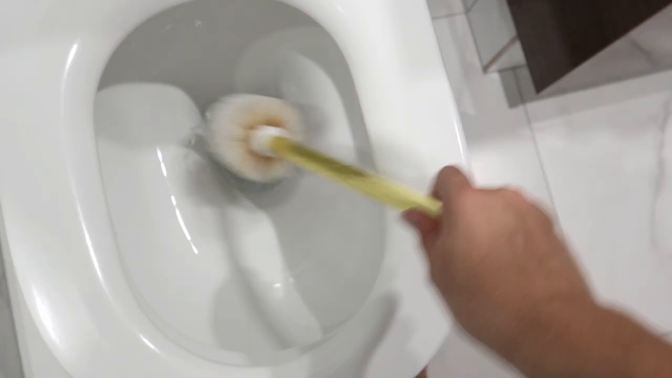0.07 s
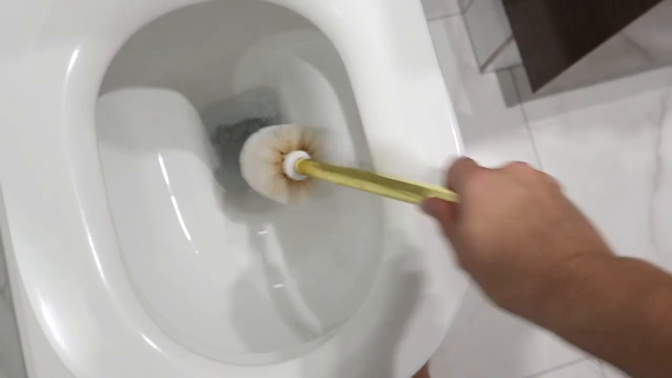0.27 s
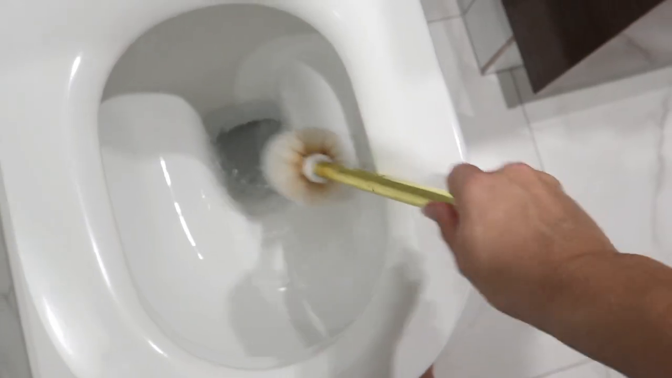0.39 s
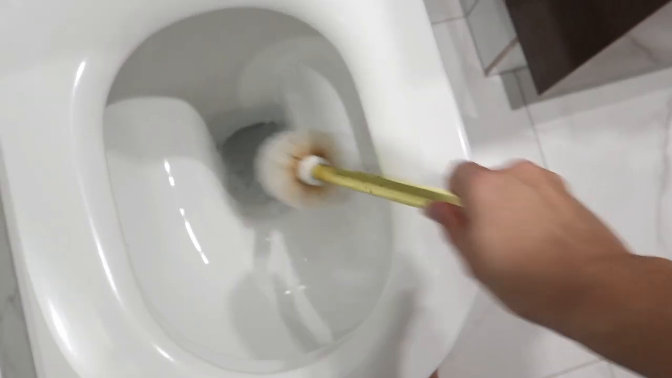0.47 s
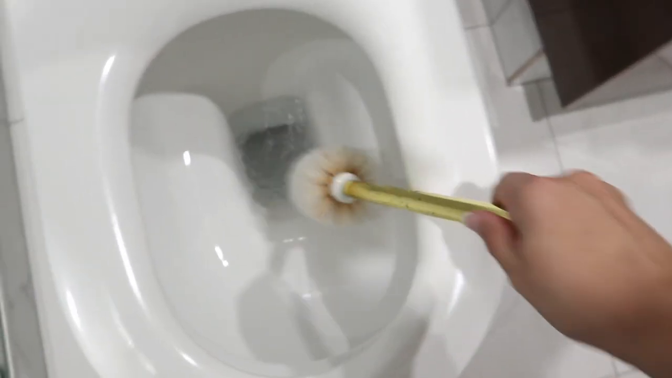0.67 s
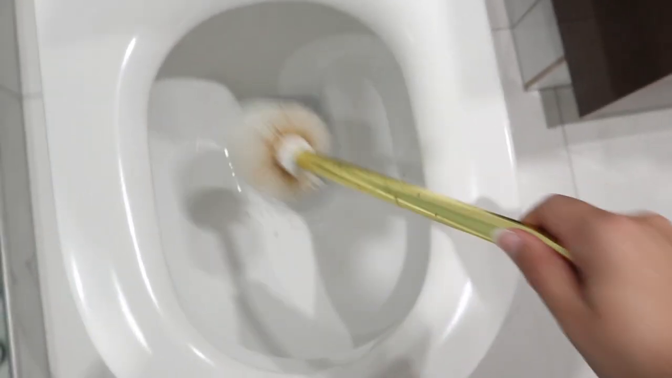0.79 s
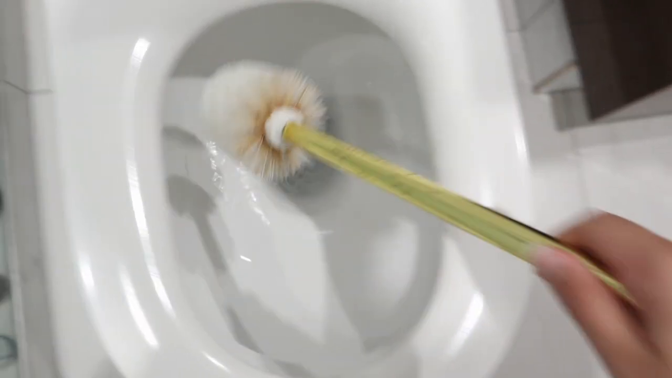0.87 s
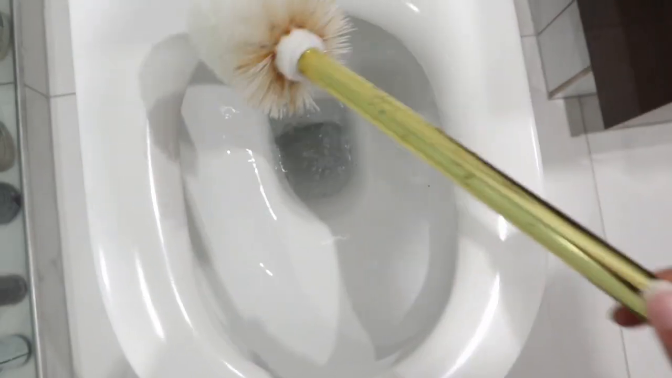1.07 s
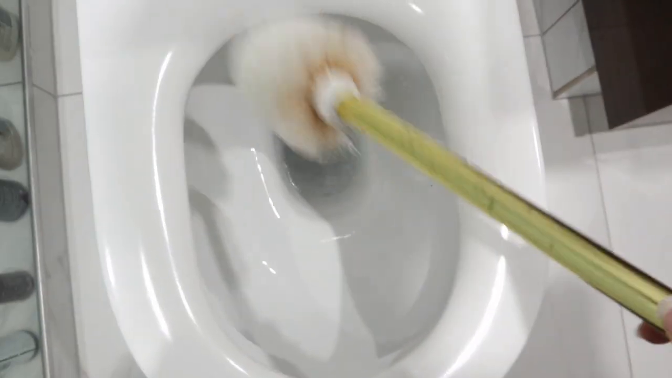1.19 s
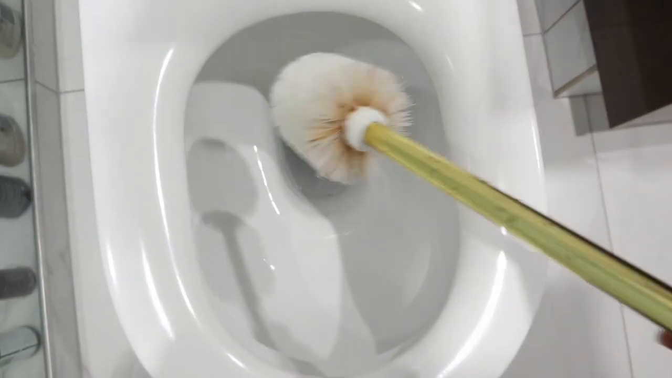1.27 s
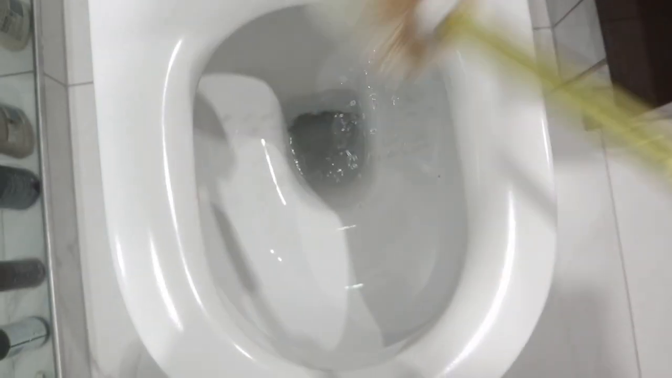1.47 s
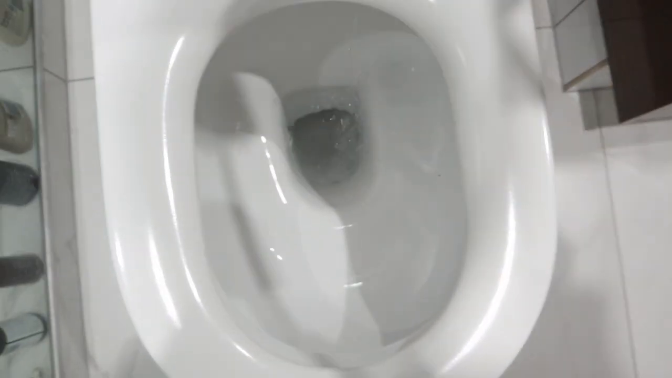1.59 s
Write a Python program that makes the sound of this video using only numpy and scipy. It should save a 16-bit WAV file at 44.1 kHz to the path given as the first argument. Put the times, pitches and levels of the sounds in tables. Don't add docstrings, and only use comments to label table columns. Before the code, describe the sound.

Toilet brush knocks three times on a porcelain bowl, then tiny drips, over bathroom fan hum

```python
import sys
import numpy as np
from scipy import signal
from scipy.fft import rfft, irfft, next_fast_len
from scipy.io import wavfile
from scipy.ndimage import uniform_filter1d

SR = 44100
rng = np.random.default_rng(int(sys.argv[2]) if len(sys.argv) > 2 else 0)


def wav_record(signal):
    frames = np.transpose(np.atleast_2d(signal))
    bounded = np.clip(frames, -1, 1)
    quanta = np.round(bounded * 32767).astype(np.int16)
    wavfile.write(sys.argv[1], SR, quanta)


def nominal_scale(level):
    x = np.asarray(level, float) / 20
    return 10 ** x


N = 72765


def evened(x):
    return x / np.sqrt(np.mean(x ** 2) + 1e-20)


def read(points, hz):
    f, value = np.transpose(points)
    return np.interp(np.log(hz + 1), np.log(f + 1), value)


def add(mix, s, sound):
    part = mix[round(s * SR):][:len(sound)]
    part += sound[:len(part)]


def hum():
    hum_hz, hum_db, wobble_db = 100.4, -32, 1.3
    t = np.arange(N) / SR
    wavers = [np.sin(2 * np.pi * (f * t + rng.random())) / np.sqrt(f) for f in np.geomspace(4, 24, 12)]
    level_db = hum_db + wobble_db * evened(sum(wavers))
    return nominal_scale(level_db) * np.sqrt(2) * np.sin(2 * np.pi * hum_hz * t)


def fan():
    # (f/Hz, level/dB per Hz)
    rush = [(25, -9), (70, -9), (250, -1), (500, -10), (1100, -17.5), (2200, -19.5), (6000, -24.5),
            (14000, -45.5)]
    # (f/Hz, width/Hz, level/dB)
    resonances = [(78, 20.6, 2), (204, 15, -46), (223, 8.3, -11.5), (304, 8.5, -9), (394, 25, -5),
                  (495, 33.5, -0.5), (779, 47, 1.5), (951, 115, -4.5), (1408, 97, -7.5), (1914, 89, -16.5)]
    rush_db, resonance_db, patch_db = -34.5, -37, 1.76
    frames, hz = N // 512 + 5, np.fft.rfftfreq(2048, 1 / SR)
    a, b, c, d, patches = rng.standard_normal((frames, 1025, 5)).T
    patches = uniform_filter1d(patches, size=16, axis=0)
    patches = evened(uniform_filter1d(patches, size=6, axis=1))
    peaks = sum(nominal_scale(db) / (1 + (2 * (hz - f) / width) ** 2) for f, width, db in resonances)
    shape = nominal_scale(rush_db) * evened(nominal_scale(read(rush, hz))) + nominal_scale(resonance_db) * evened(peaks)
    noise = np.array([a + 1j * b, c + 1j * d]) * nominal_scale(patch_db * patches)
    unit = np.std(signal.istft(noise, nperseg=2048, noverlap=1536)[1])
    air = signal.istft(noise * shape[:, None], nperseg=2048, noverlap=1536)[1]
    return air[:, :N] / unit


def room(x, cut_s):
    # (f/Hz, time to fall 60 dB/s)
    decay = [(200, 0.44), (500, 0.53), (1500, 0.46), (4000, 0.54), (8000, .2), (12000, 0.17)]
    start_s = 0.0012
    taps = np.zeros((2, SR))
    at = np.arange(0, SR - 20, 20) + rng.integers(0, 20, (2, SR // 20 - 1))
    np.put_along_axis(taps, at, rng.choice([-1., 1.], at.shape), 1)
    hz, t, z = signal.stft(taps, SR, nperseg=256)
    fall = nominal_scale(-60 * t / read(decay, hz)[:, None])
    tail = signal.istft(z * fall, SR, nperseg=256)[1]
    t = np.arange(tail.shape[1]) / SR
    tail = tail * np.clip(t / start_s - 1, 0, 1)
    tail = tail / np.linalg.norm(tail[0]) * np.clip((cut_s - t) / .01, 0, 1)
    return signal.fftconvolve(x[None], tail, axes=1)[:, :N]


def drops():
    # (t/s, level/dB, length/s, echo level/dB, echo length/s)
    ticks = [
        (.8041, -11.5, 0.0019, -10, 0.057),
        (.8043, -24.5, 0.00087, -20, 0.016),
        (.8670, -4.5, 0.00026, -8.5, 0.09),
    ]
    # (lowest f/Hz, highest f/Hz)
    bands = [(3000, 6270), (6270, 10600), (2330, 4020)]
    out, t = np.zeros((2, N)), np.arange(600) / SR
    for (s, db, length, echo_db, echo_s), band in zip(ticks, bands):
        puff = rng.standard_normal(len(t)) * np.exp(-t / length)
        puff = signal.sosfilt(signal.butter(6, band, "bandpass", fs=SR, output="sos"), puff)
        near = np.zeros(N)
        add(near, s, nominal_scale(db) * puff / abs(puff).max())
        out += near + nominal_scale(echo_db) * room(near, echo_s)
    return out


def ring(modes, shorten=1):
    t = np.arange(SR // 2) / SR
    return sum(nominal_scale(db - 60 * t / (t60 * shorten)) * np.sin(2 * np.pi * hz * t) for hz, db, t60 in modes)


def scatter(x):
    return signal.fftconvolve(x, evened(rng.standard_normal(128)) / np.sqrt(128))[:len(x)]


def knocks():
    # (t/s, strength/dB, low thud/dB, brightness/dB)
    hits = [
        (0.2074, 3, -5, 6.5),
        (0.3839, -0.5, -5.5, 5),
        (0.6237, -0.5, -6, 0.5),
    ]
    # (delay/s, level/dB)
    chatter = [
        (0, 3),
        (.0066, -16),
        (0.0126, -12.5),
    ]
    # (f/Hz, level/dB, time to fall 60 dB/s)
    bright = [(1474, -32, 0.014), (1484, 3.5, 0.029), (1587, 2.5, 0.026), (1620, 7, 0.017),
              (2004, -14.5, 0.12), (2295, 8.5, 0.016), (2473, -6, 0.034), (2647, -2, 0.034),
              (3346, -17.5, 0.045), (3846, 2.5, 0.026), (4175, -1, 0.017), (4895, -7.5, 0.017),
              (5330, -11, 0.034), (6150, -1.5, 0.01)]
    # (f/Hz, level/dB, time to fall 60 dB/s)
    hollow = [(438, 3.5, 0.041), (630, -3, 0.038), (757, -3.5, 0.048), (880, -14.5, 0.09),
              (1190, -8.5, 0.017)]
    # (f/Hz, level/dB, time to fall 60 dB/s)
    air = [(216.9, -5, 0.44), (309.3, -11, 0.25), (371, -21, 0.27), (448, -14.5, 0.19), (459, -19, 0.36),
           (494.5, -10.5, 0.24), (831, -8.5, 0.17)]
    knock_db, body_db, luck_db = -9, 6.5, 1.63
    crack_db, crack_s, crack_hz = 4, 0.0017, 6480
    body_rise_s, air_rise_s = .0028, 0.019
    air_wet_db, room_db = 3.5, -4
    blur = 0.34
    out, far, t = np.zeros((2, N)), np.zeros(N), np.arange(SR // 2) / SR
    swell = ring(air) * (1 - np.exp(-t / air_rise_s))
    for s, db, thud_db, bright_db in hits:
        blow = np.zeros(1000)
        for delay, step_db in chatter:
            add(blow, delay, nominal_scale(step_db + body_db) * np.ones(1))
        bowl = [(hz, mode_db + luck_db * rng.standard_normal(), t60) for hz, mode_db, t60 in bright]
        body = (ring(bowl) + nominal_scale(thud_db) * ring(hollow)) * (1 - np.exp(-t / body_rise_s))
        body = signal.fftconvolve(blow, body)[:len(t)]
        burst = (t / crack_s) * np.exp(-t / crack_s)
        crack = nominal_scale(crack_db + bright_db) * rng.standard_normal(len(t)) * burst
        crack = signal.lfilter(*signal.butter(2, [800, crack_hz], "bandpass", fs=SR), crack)
        near = nominal_scale(db + knock_db) * (body + crack + 0.82 * swell)
        add(out[0], s, near)
        add(out[1], s, scatter(near))
        blurred = ring(bright, blur) + nominal_scale(thud_db) * ring(hollow, blur)
        add(far, s, nominal_scale(db + knock_db) * (blurred + crack + nominal_scale(air_wet_db) * swell))
    out = out + nominal_scale(room_db) * room(far, 0.94)
    return signal.sosfilt(signal.butter(3, 130, "highpass", fs=SR, output="sos"), out)


def ports(field, lag_share=1, same_share=1):
    # (f/Hz, likeness 0-1)
    likeness = [(100, .99), (600, 0.99), (1500, 0.87), (4000, 1), (7000, 1), (12000, 0.93)]
    # (f/Hz, phase/radians)
    lead = [(200, .1), (1600, 0.61), (2400, 1.42), (3600, 1.91), (5000, 2.124), (7000, 2.656),
            (16000, 2.44)]
    left_db = -0.85
    size = next_fast_len(N + 4096)
    hz, (a, b) = np.fft.rfftfreq(size, 1 / SR), rfft(field, size, axis=1)
    same = np.clip(read(likeness, hz), 0, 1) ** (1 / same_share)
    turn = np.exp(.5j * lag_share * read(lead, hz))
    own = np.sqrt((1 + same) / 2) * a
    other = 1j * np.sqrt((1 - same) / 2) * b
    both = np.array([nominal_scale(left_db) * (own + other) * turn, (own - other) / turn])
    return irfft(both, size, axis=1)[:, :N]


def scene():
    background = ports(fan() + hum())
    return background + ports(knocks() + drops(), lag_share=0.87, same_share=0.4)


def gate_mid(x):
    # (f/Hz, level/dB)
    threshold = [(5800, -100), (6800, -83.5), (9000, -87.5), (12500, -101), (15000, -100)]
    from_hz, luck_db = 5800, 3
    mask_share, mask_from_db = 0.98, -66
    mid, side = (x[0] + x[1]) / 2, (x[0] - x[1]) / 2
    hz, t, z = signal.stft(mid, SR, nperseg=1024, noverlap=512)
    band = np.minimum(np.arange(len(hz)) // 10 * 10 + 5, len(hz) - 1)
    power = uniform_filter1d(abs(z) ** 2, size=10, axis=0)[band]
    luck = rng.standard_normal((len(t), len(hz)))
    luck = np.repeat(luck, 3, axis=0)[:len(t)].T[band]
    frame_db = 10 * np.log10((abs(z[40:140]) ** 2).mean(0) + 1e-14)
    lift_db = np.clip(mask_share * (np.roll(frame_db, 1) - mask_from_db), 0, 20)
    gate_db = read(threshold, hz)[:, None] + luck_db * luck + lift_db
    heard = (power > nominal_scale(2 * gate_db)) | (hz[:, None] < from_hz)
    mid = signal.istft(z * heard, SR, nperseg=1024, noverlap=512)[1][:N]
    return np.array([mid + side, mid - side])


def band_limit(x):
    return signal.sosfilt(signal.butter(12, 18130, fs=SR, output="sos"), x)


def record(dry):
    # (t/s, gain/dB)
    gain = [(0, 2), (0.208, 0.5), (0.233, -10), (.3, -9.5), (0.387, -8), (.41, -12), (0.622, -7.5),
            (0.651, -11.5), (.8, -10), (.95, -8.5), (1.15, -7), (1.452, -4), (1.65, -2.5)]
    low_cut_hz, top_hz, clip_level = 30.7, 13000, 1.5
    cut = signal.sosfilt(signal.butter(1, low_cut_hz, "highpass", fs=SR, output="sos"), dry)
    loud = cut * nominal_scale(np.interp(np.arange(N) / SR, *np.transpose(gain)))
    clipped = clip_level * np.tanh(loud / clip_level)
    clipped = signal.sosfilt(signal.butter(5, top_hz, fs=SR, output="sos"), clipped)
    mix = np.clip(gate_mid(clipped), -1, 1)
    return band_limit(mix)


dry = scene()
out = record(dry)
wav_record(out)
```